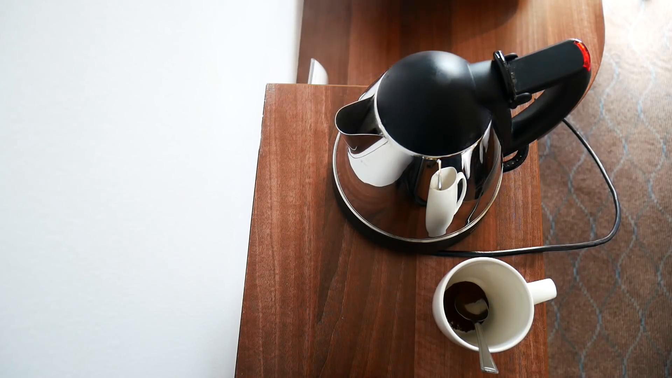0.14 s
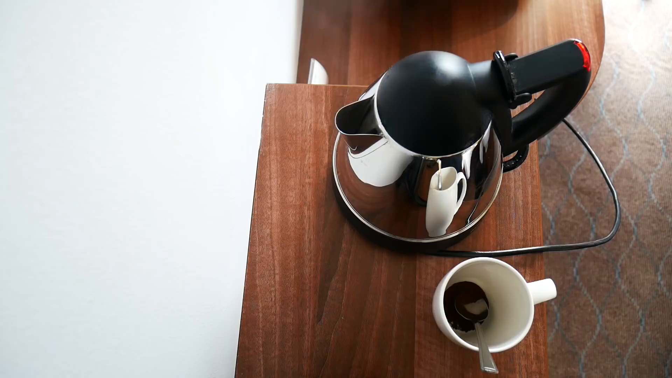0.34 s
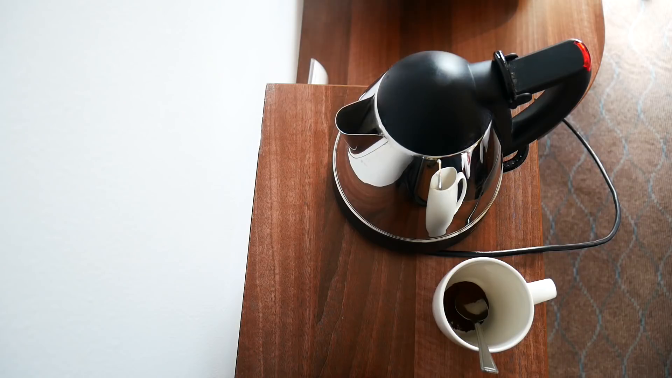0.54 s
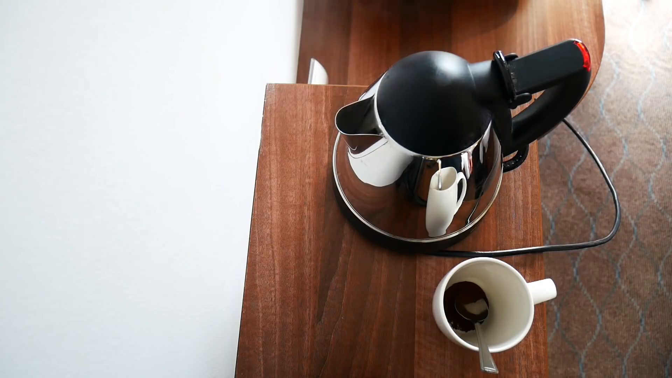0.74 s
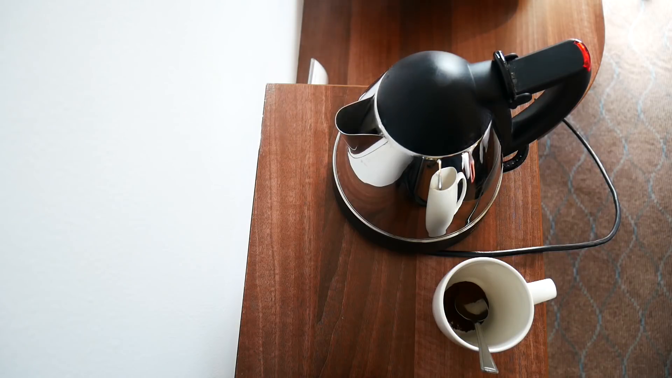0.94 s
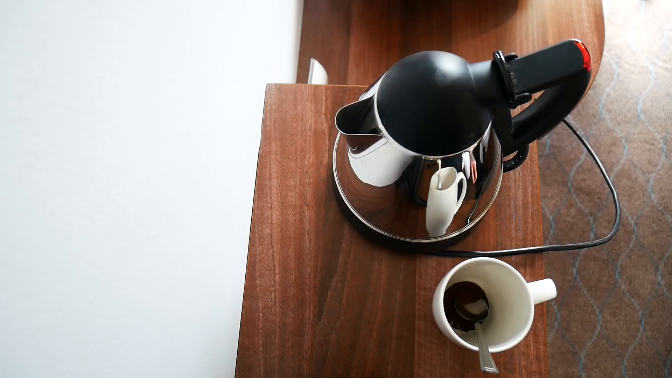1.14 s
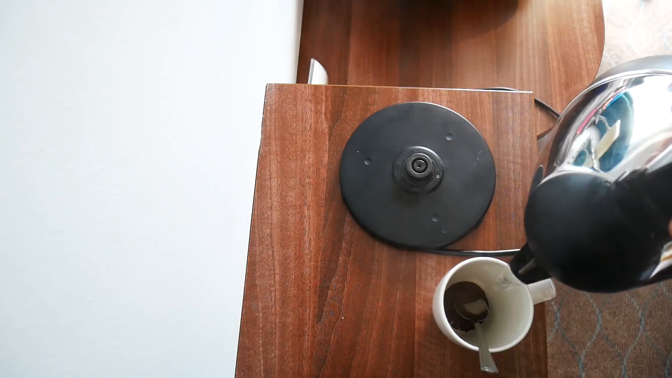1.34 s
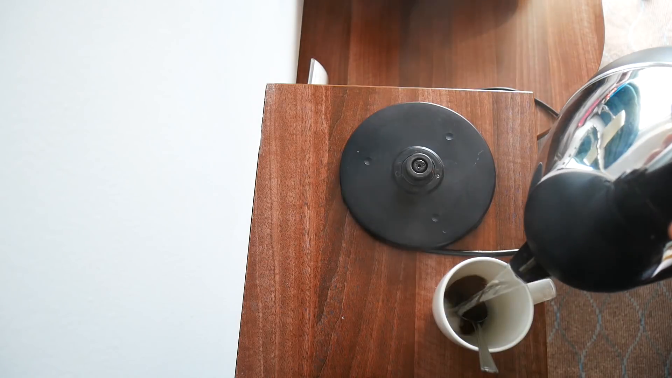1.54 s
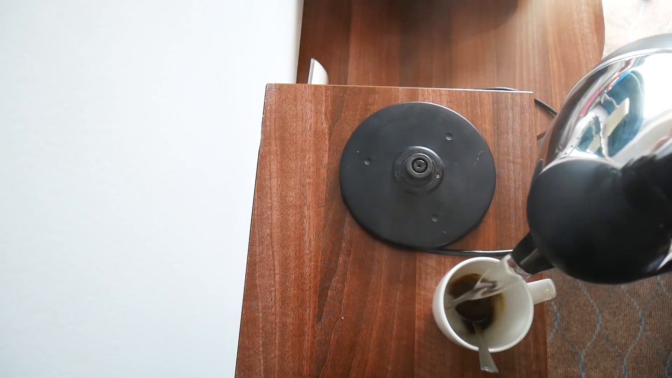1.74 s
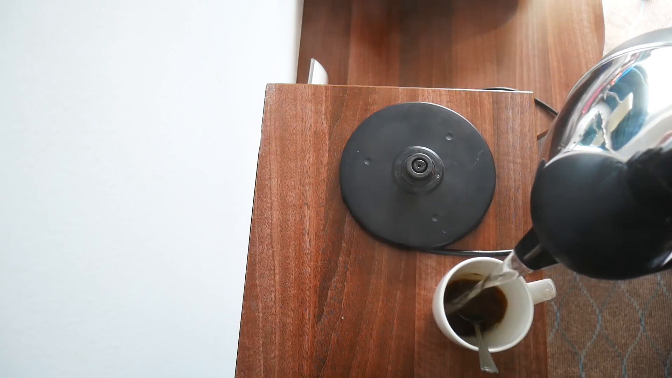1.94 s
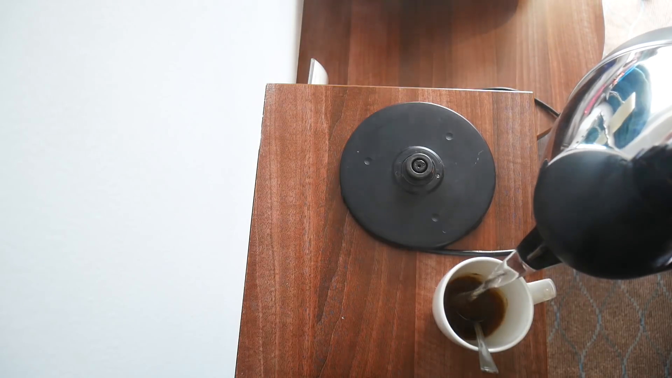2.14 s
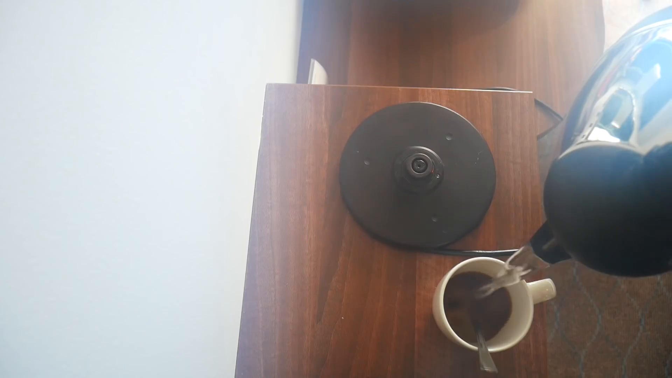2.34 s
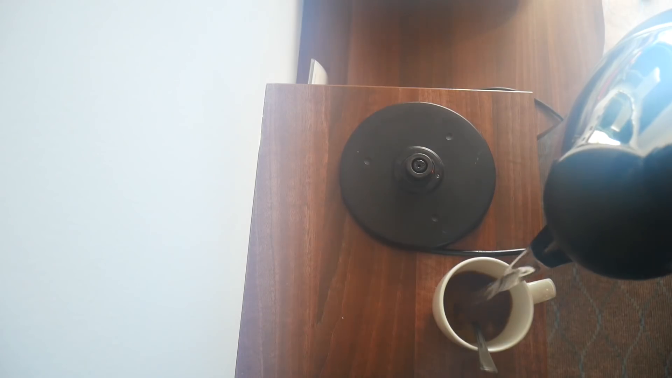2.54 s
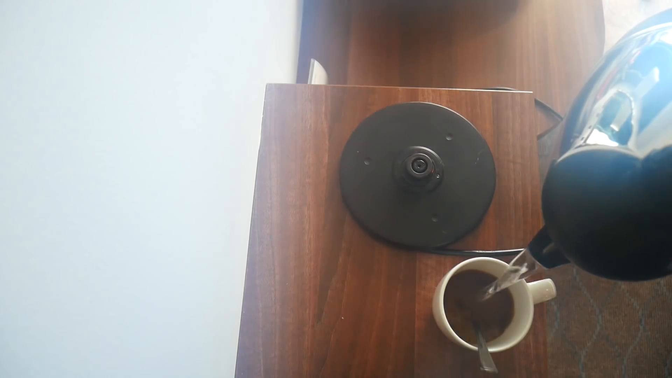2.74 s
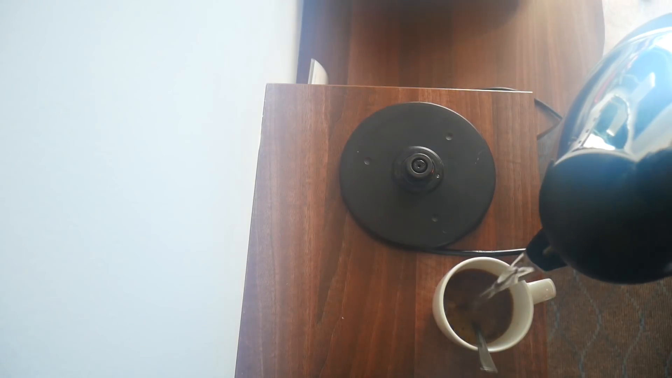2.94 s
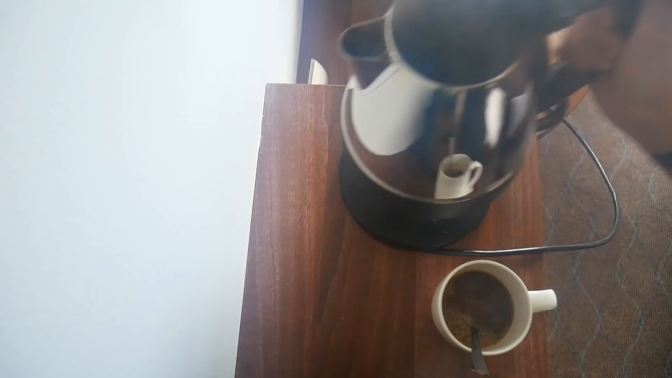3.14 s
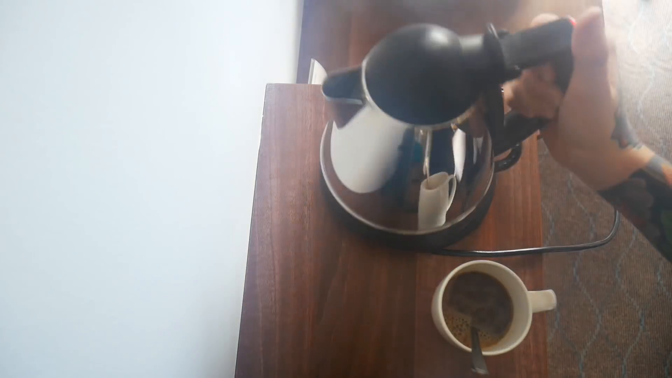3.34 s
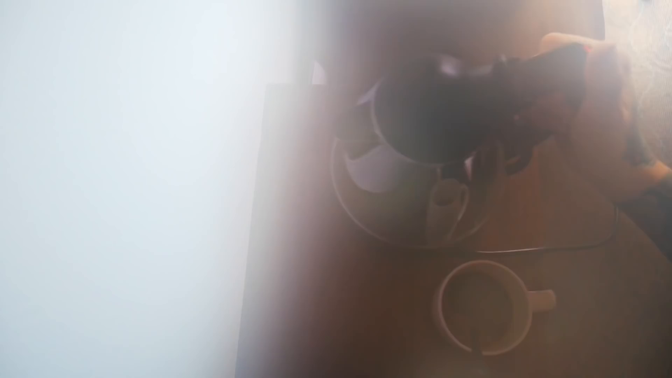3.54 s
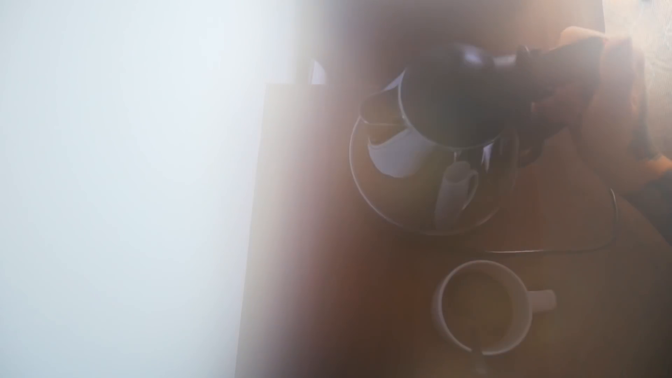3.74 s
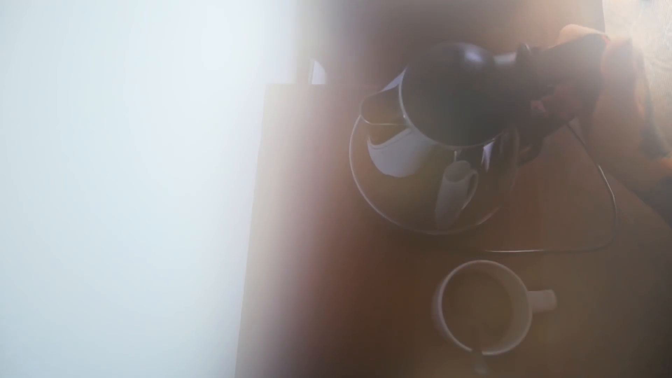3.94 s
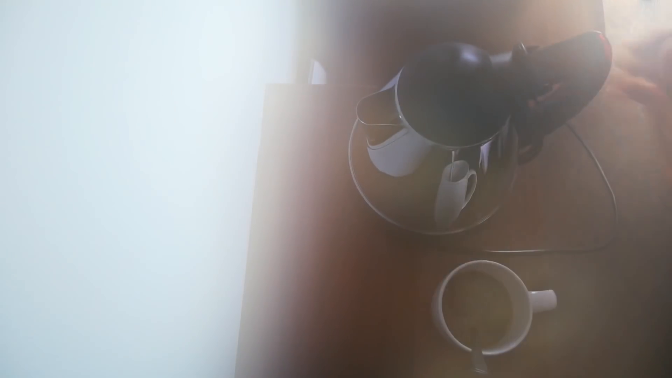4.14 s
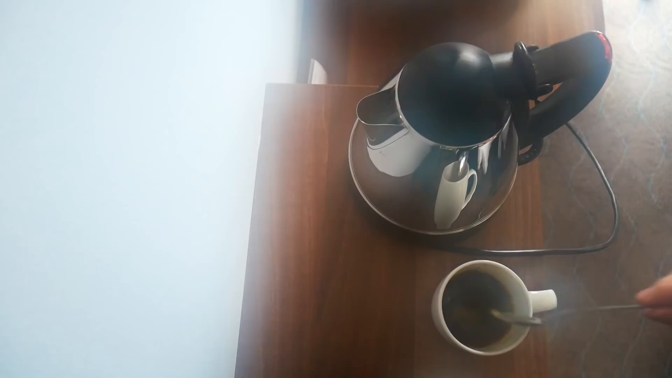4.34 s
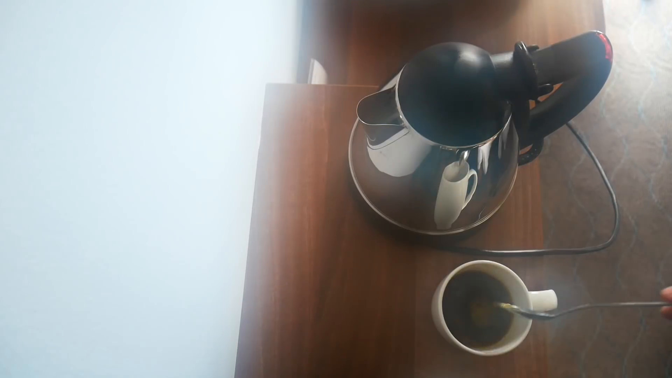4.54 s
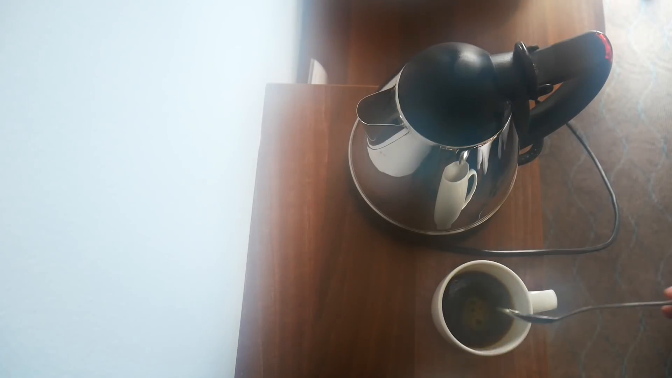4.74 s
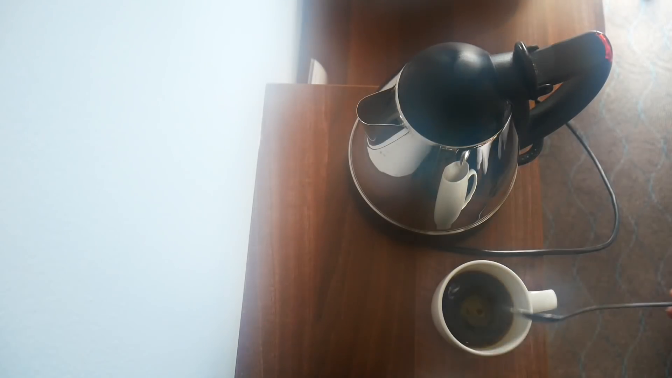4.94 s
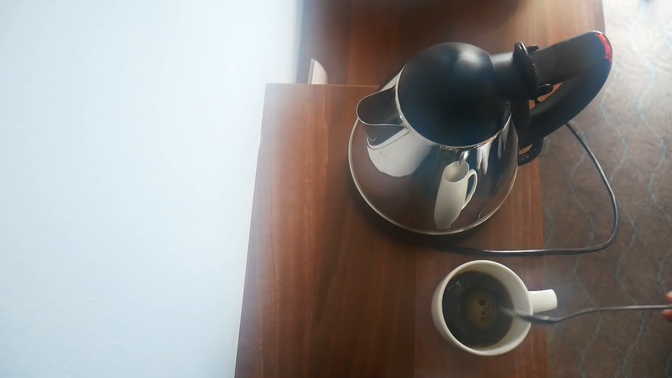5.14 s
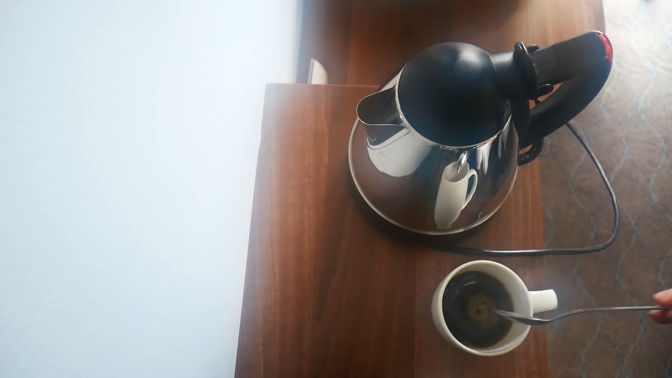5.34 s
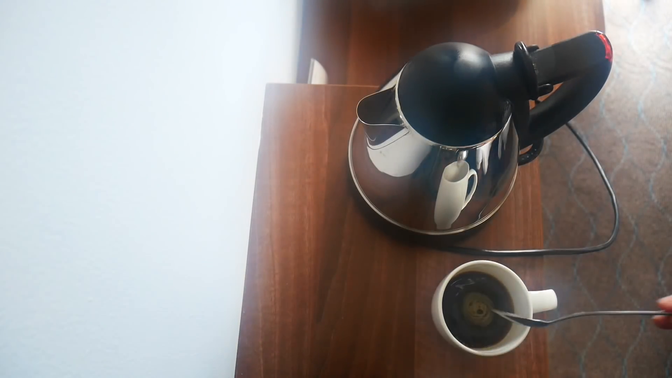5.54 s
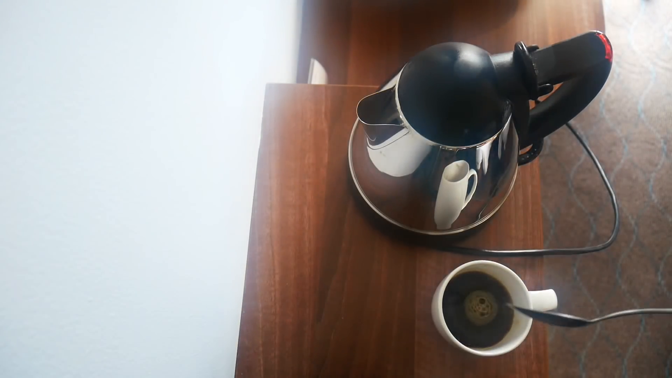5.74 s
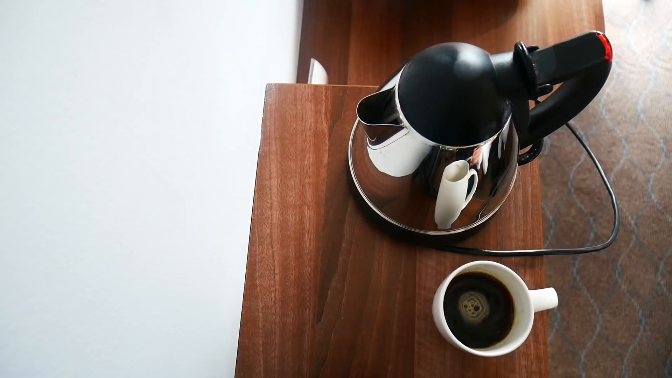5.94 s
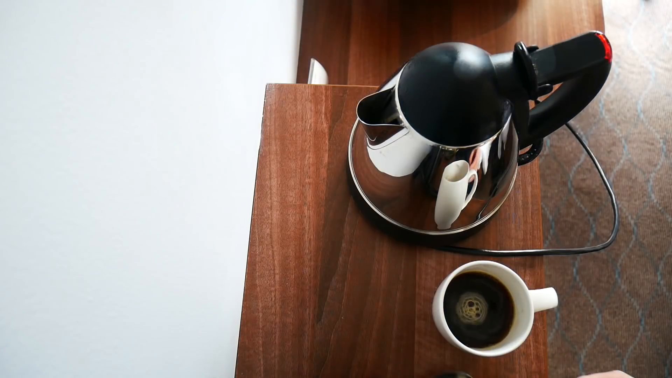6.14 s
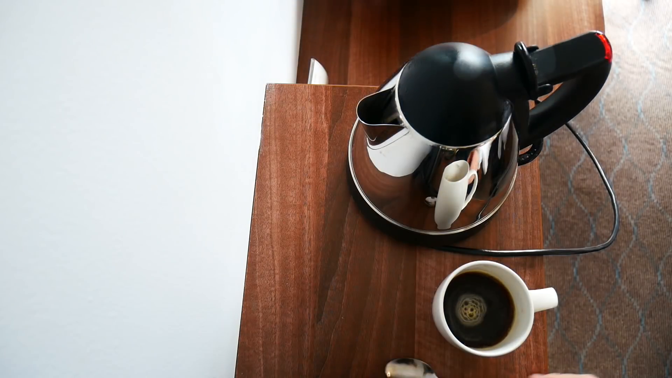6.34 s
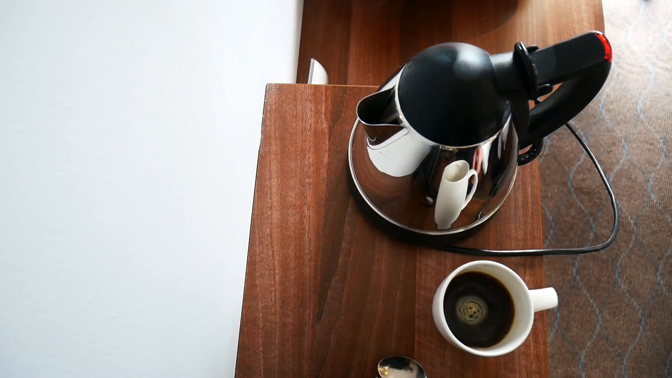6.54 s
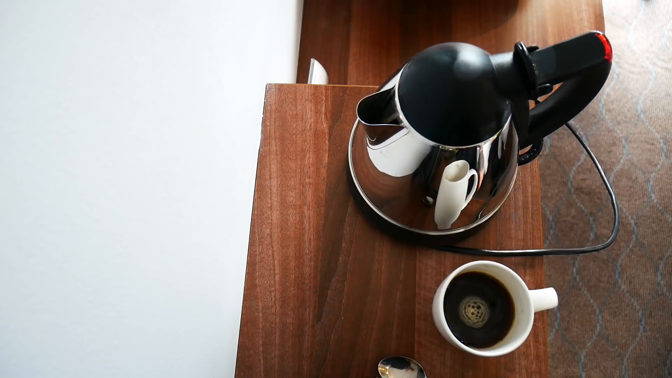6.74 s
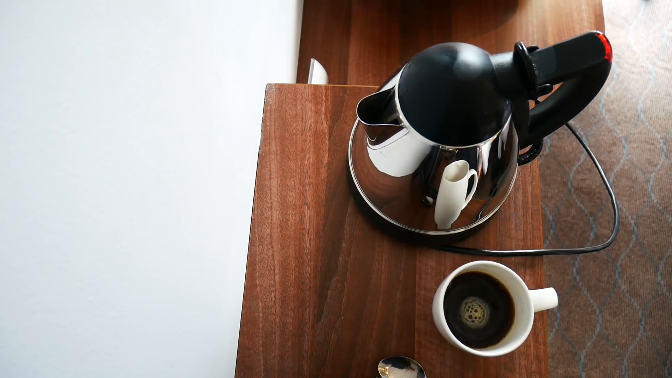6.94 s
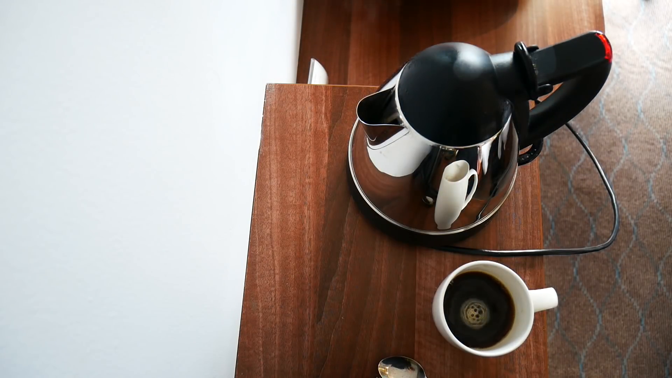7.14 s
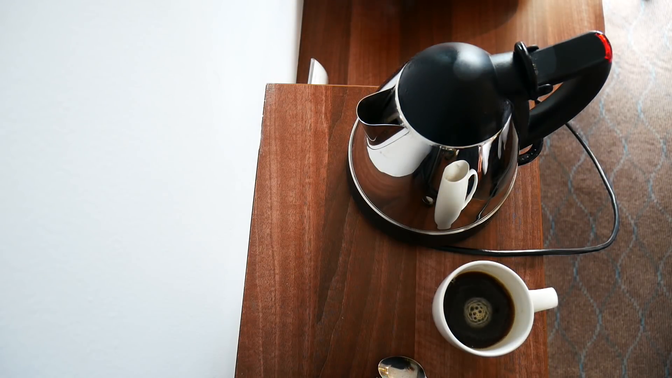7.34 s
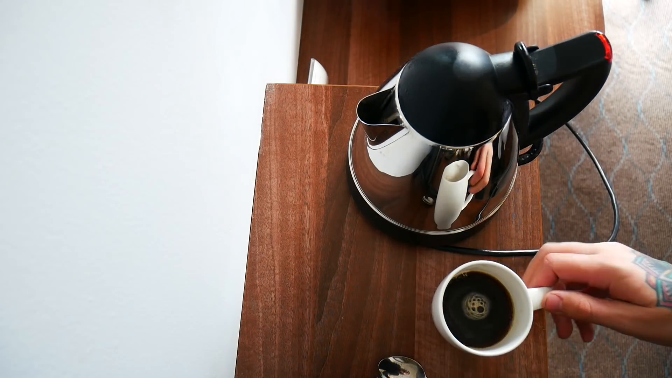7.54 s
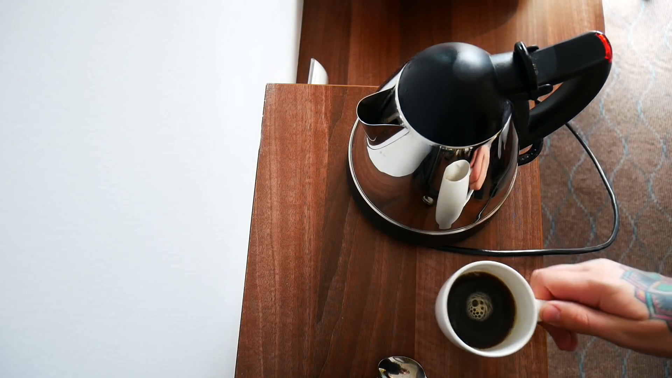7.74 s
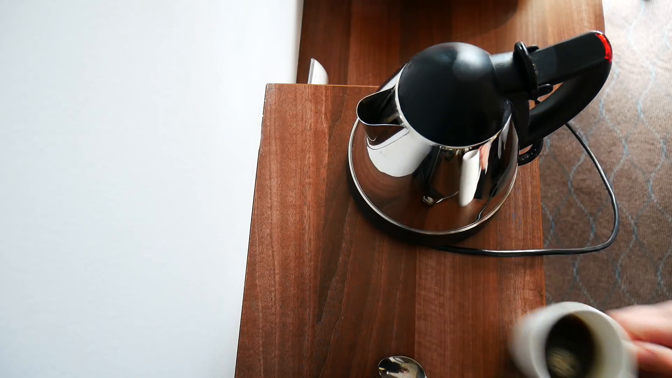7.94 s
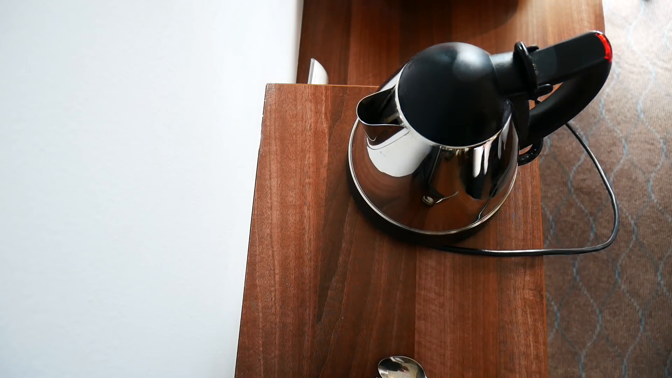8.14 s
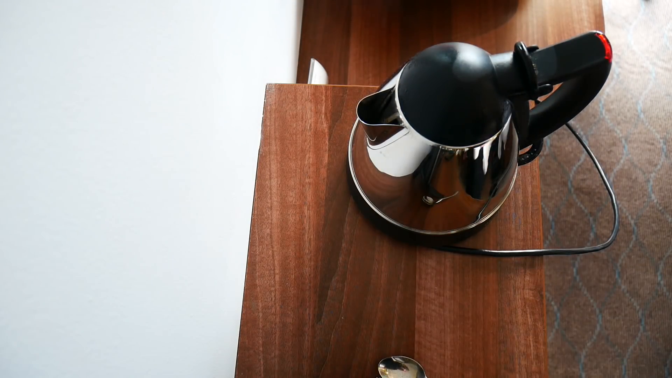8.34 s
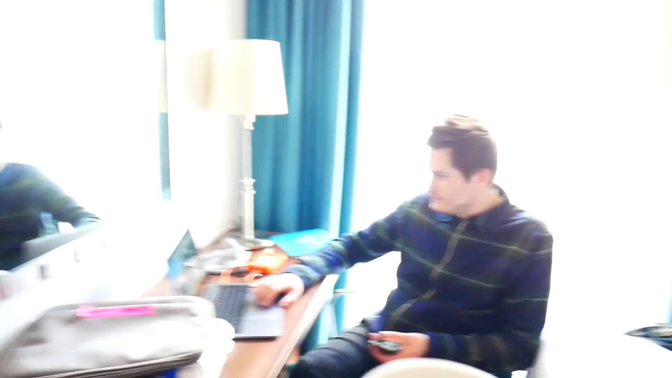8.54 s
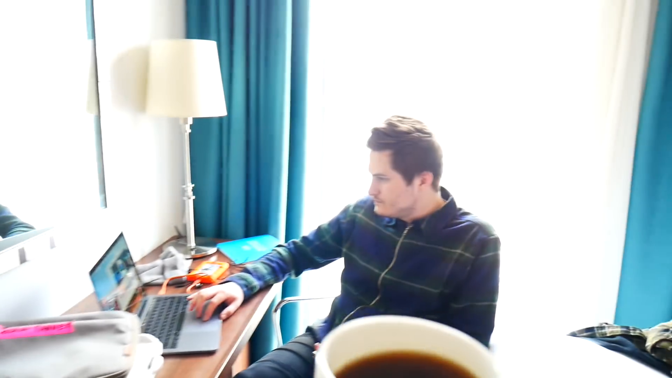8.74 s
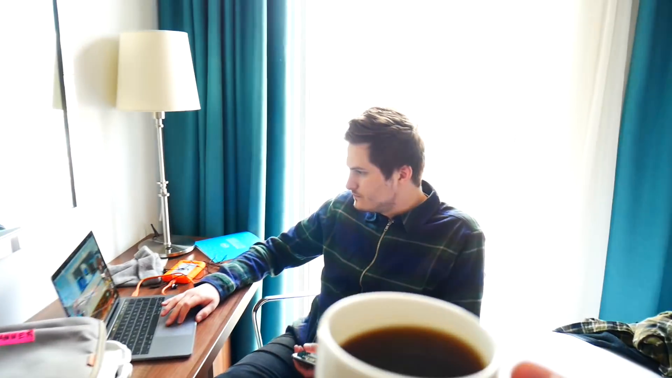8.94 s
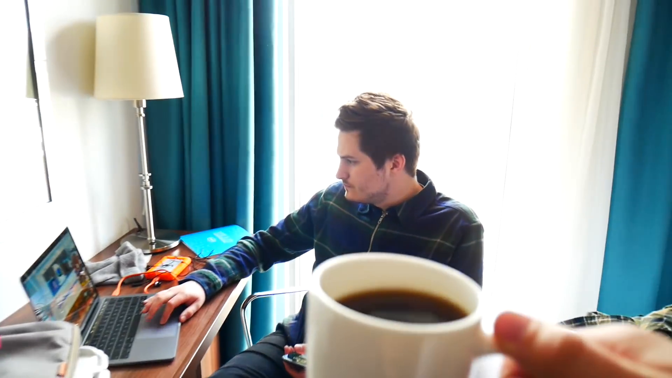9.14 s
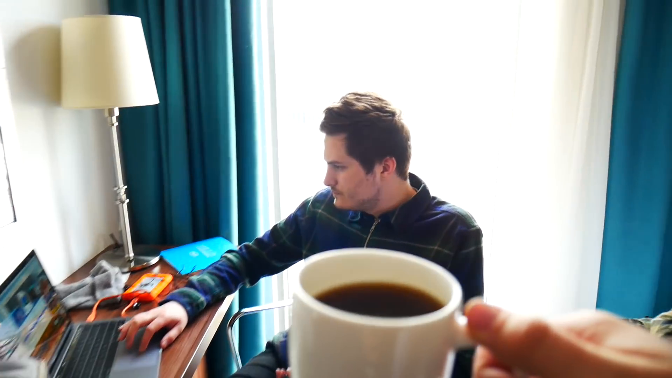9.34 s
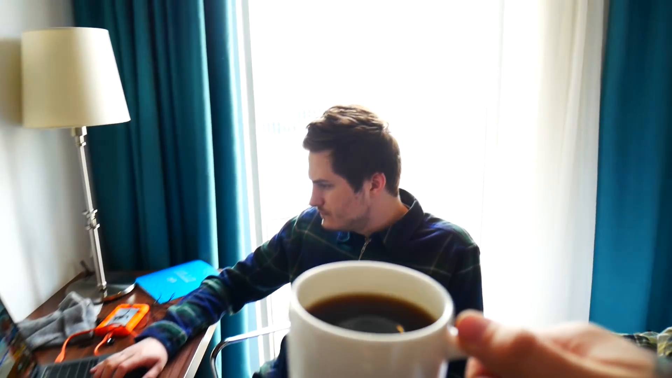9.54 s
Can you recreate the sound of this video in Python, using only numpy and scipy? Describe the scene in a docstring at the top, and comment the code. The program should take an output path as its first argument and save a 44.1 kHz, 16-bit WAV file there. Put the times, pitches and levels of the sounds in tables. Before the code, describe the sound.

In a quiet room, a steel kettle rumbles and fizzes. After a click, water gurgles into a ceramic mug, and the kettle knocks back onto its base. A spoon taps the mug five times, then drops and rocks on a wooden desk. The mug is briefly dragged away and two soft brushing sounds follow. The microphone is close, and a faint camera lens motor whirrs four times.

```python
"""In a quiet room, steam bubbles rumble and fizz in a steel kettle on a wooden desk. After a click,
water gurgles and splashes into a mug, and a camera's lens motor whirrs for the first of four times.
The kettle sloshes and knocks back onto its base. A spoon taps the mug five times, making it ring,
then is dropped and rocks on the desk. The mug is dragged away, shaking the wood, and two soft
brushing sounds pass under the last whirr of the motor."""
import sys
import numpy as np
from scipy import signal
from scipy.fft import rfft, irfft, next_fast_len
from scipy.io import wavfile
from scipy.ndimage import uniform_filter1d

SR = 44100
rng = np.random.default_rng(int(sys.argv[2]) if len(sys.argv) > 2 else 0)


def output_pcm(signal):
    """Save a mono or channel-first signal as 16-bit PCM at the path in sys.argv[1].

    Samples are clipped to [-1, 1] before scaling.
    """
    pcm = np.clip(np.atleast_2d(signal).T, -1, 1) * 32767
    wavfile.write(sys.argv[1], SR, np.round(pcm).astype(np.int16))


N = 422037

# Levels are relative: 6 dB more is about twice the height of wave. A fade time is for a 60 dB drop.
# Tone colours say how strong the lows and highs are. Each row: frequency in Hz, level in dB.
HUM_TONE = [(15, -60.5), (25, -24.5), (165, -11.5), (195, -2.5), (271, -7), (315, -2.5), (366, -11.5),
            (395, -5.5), (425, -11), (525, -9), (900, -30.5), (1170, -53.5), (1980, -120)]
AIR_TONE = [(410, -25), (700, -5.5), (910, -12), (1180, -9.5), (1640, -7), (1840, -9.5), (2130, -8),
            (2660, -13), (2840, -10), (5120, -25.5), (7000, -51), (16000, -90.5)]
HIGH_AIR_TONE = [(3000, -30), (5500, -1), (8000, -1.5), (10100, 0), (12000, -8.5), (14200, -12),
                 (16000, -28)]
RUMBLE_TONE = [(24, -78), (40, -66.5), (59, -45), (152, -15), (243, -11.5), (274, -1.5), (350, 1.5),
               (384, -4), (452, -2.5), (524, -20), (633, -15), (714, -26.5), (1000, -36.5), (1300, -61.5),
               (2200, -120)]   # big steam bubbles heard through the kettle wall
SEETHE_TONE = [(350, -18), (600, -2), (717, -18), (1040, -19), (1310, -12.5), (1570, -13.5), (1800, -11.5),
               (3080, -21.5), (3480, -17.5), (3680, -22), (5100, -28.5), (5790, -32.5), (7900, -33.5),
               (9240, -27.5), (10600, -37.5), (13600, -43), (15100, -53), (16000, -76.5)]   # fine bubbles
GURGLE_TONE = [(410, -47), (700, -18), (807, -17), (942, -2), (1300, -7), (1570, -6), (3060, 11), (3480, 7),
               (5740, -23), (8810, -47.5), (12000, -41.5), (15600, -73.5), (22000, -120)]
SPRAY_TONE = [(3000, -28), (5000, 3), (6500, -12), (9000, -5), (11000, -15), (14500, -22), (16000, -50)]
DRIP_TONE = [(2000, -29), (4500, 16), (6500, -2), (9000, 13), (11500, -12), (14500, -9), (16000, -40)]
KETTLE_THUD_TONE = [(59, -60), (100, -20.5), (244, -3.5), (322, -5.5), (608, 2), (736, -2.5), (900, -5.5),
                    (1300, -14), (3000, -47), (16000, -99)]
KETTLE_CLACK_TONE = [(100, -54), (600, -16), (950, -8), (1400, 0.5), (1800, -4), (2080, -4), (2750, -4.5),
                     (3500, -11.5), (4500, -22), (6020, -30), (10000, -31.5), (16000, -66)]
KETTLE_TICK_TONE = [(2000, -25), (4500, -1), (7000, -2), (9500, 1), (12000, -18), (16000, -45)]
TAP_TONE = [(59, -66), (100, -42), (271, -12.5), (570, -16), (648, -9), (784, -26.5), (1420, -11),
            (1720, -30), (2130, -3.5), (2580, -12.5), (2930, -8), (3700, -17), (4770, -28), (5080, -31),
            (7500, -32), (10200, -27.5), (12000, -50), (13300, -41), (16000, -68)]
BOUNCE_TONE = [(1000, -18), (3000, 2), (6000, -27), (8500, -3), (10800, 3), (12000, -25), (13300, -10),
               (16000, -38)]
DESK_TONE = [(35, -86), (60, -40), (123, -28), (229, -9.5), (285, 0), (373, -3.5), (508, -8), (570, -18.5),
             (649, -6.5), (787, -26), (967, -21.5), (1100, -43), (1300, -39), (1690, -77), (2860, -120)]
DROP_TONE = [(59, -57.5), (100, -20.5), (129, -20), (147, -23.5), (260, -4.5), (398, -8), (648, -5),
             (1030, -11), (1910, -2.5), (2520, -6), (3470, -4.5), (5190, -20), (8830, -21.5), (11500, -44),
             (13000, -40), (16000, -85)]
SPOON_TICK_TONE = [(2500, -28), (4000, 7), (10500, -1), (12500, -20), (15000, -33.5)]
GRIT_TONE = [(530, -17), (900, -4), (979, 2.5), (1190, -9.5), (1550, -3), (1720, -6), (3430, -10.5),
             (4310, -19.5), (5750, -13.5), (6640, -24), (9530, -13), (14700, -47), (16000, -63)]
LOW_BRUSH_TONE = [(400, -4), (900, -9), (1800, -3), (4000, -10), (6000, -34), (9000, -56)]
HIGH_BRUSH_TONE = [(5000, -34), (8500, -2), (10500, 2), (11500, -25), (13000, -47)]

# Resonances are pitches that an object boosts. Each row: pitch in Hz, width in Hz, level in dB.
SHELL_PEAKS = [(1297, 41, -1.5), (1800, 55, -4), (2094, 49, 0), (3422, 63, 9.5), (4480, 92, -7),
               (5000, 53, -1)]   # the kettle's steel wall
HOLLOW_PEAKS = [(1290, 12, 10), (2030, 54, 2.5), (2960, 190, 3.5), (3400, 150, 0.5), (3700, 80, -5)]   # the half-empty kettle
GEAR_PEAKS = [(2380, 400, 18.5), (3140, 300, 21), (3740, 450, -3)]

# Modes are the notes a struck object rings with. Each row: pitch in Hz, level in dB, fade in seconds.
CLINK_MODES = [(2396, 0.5, 0.16), (2500, -7, 0.098), (3420, -14, .07), (4160, -1.5, 0.041),
               (4640, -12, 0.06), (5570, -19, 0.091), (7160, -15, 0.16), (7300, -23, .1),
               (10500, -29, 0.17)]
MUG_MODES = [(637, -25, 0.21), (1500, -12.5, 0.1), (2260, -26, 0.15), (2550, -27, .2), (2986, -5.5, 0.094),
             (3520, -10, 0.078), (3800, -34, .07), (4630, -8, 0.037), (5300, -26, 0.029),
             (6840, -13, 0.049), (8620, -23, 0.1), (9840, -21, 0.089), (9800, -29, 0.09),
             (11200, -34, 0.07), (13000, -28, 0.1), (13320, -31, 0.13)]
SPOON_MODES = [(hz, db, t60) for hz, (db, t60) in zip( [1933, 3566, 4718, 6963, 8555, 9555, 10076, 10980, 11241, 12669, 13320],
               [(-13.0, 0.2), (-10, 0.22), (-1.0, 0.27), (-16.5, 0.19), (-19, 0.55), (-21.0, 0.11),
               (-0.5, 0.094), (-27.5, .3), (-16.5, 0.23), (-25.5, 0.24), (-34, 0.19)])]
DESK_MODES = [(242, -14.5, .1), (302, -3.5, .13), (339, -3, .12), (456, -9, .094), (639, -8.5, .11)]

# Sounds that swell and fade. Each row: time of full strength in seconds, hold in seconds, level in dB.
FIZZ = [(0, .039, -38.5)]
SLOPS = [(3.146, 0.011, -37.5), (3.2, 0.018, -42), (3.256, 0.016, -40.5), (3.298, 0.021, -41.5),
         (3.35, 0.026, -43.5)]   # water in the swung kettle
HOLLOW_NOTE = [(4.545, 0.053, -46)]
MOTOR_RUNS = [(2.25, 0.78, -60.5), (4.0, 1.58, -55.5), (5.98, 0.33, -55.5), (8.594, 0.91, -53)]
BASE_CHATTER = [(3.417, 0.013, -33), (3.748, 0.013, -20.5), (3.815, 0.021, -38), (3.85, .003, -29.5)]   # the kettle slides onto its socket
SPOON_RATTLE = [(6.435, 0.027, -31), (6.53, 0.15, -41), (6.65, 0.14, -36.5)]   # rocking on the wood
SPOON_RUB = [(6.68, 0.04, -49.5)]   # the fastest rocking rubs the steel
MUG_PUSH = [(7.79, .004, -29), (7.908, 0.19, -21.5)]   # gripped, then slid
MUG_GRATE = [(7.885, 0.086, -44.5), (8.0, 0.12, -39)]   # grit under its foot

# Short contacts. Each row: start in seconds, level in dB.
CLINKS = [(1.6235, -33.5), (1.6296, -34)]   # the stream knocks the spoon against the mug
KETTLE_TICKS = [(4.033, -41), (4.093, -43), (4.179, -34), (4.188, -36), (4.418, -36)]
GRAZES = [(4.418, -22), (4.427, -30), (4.535, -31), (4.553, -25), (4.572, -26), (4.59, -33)]   # the lifted spoon grazes the mug
CATCHES = [(7.770, -3), (7.777, 3.5), (7.824, -5.5), (7.884, -5), (7.894, -2), (7.907, 3.5), (7.933, 2),
           (7.957, 6.5), (8.01, -1), (8.036, 6), (8.058, 0), (8.108, -7)]   # the mug's foot catches on the wood

# Steps in the background. Each row: start in seconds, then hum, hiss and high hiss in dB.
ROOM_LEVELS = [(0, -46.5, -53, -68.5), (2.29, -47.5, -54.5, -78), (3.141, -46.5, -52, -70),
               (4.62, -47, -59, -74), (8.579, -52.5, -59, -76.5)]
# The boil in three stages; its sound jumps at the start of each. Each row: time in seconds, rumble in dB.
BOIL_STAGES = [
    [(0.0, -21.5), (.3, -16.5), (0.63, -17), (.95, -16.5), (1.259, -19)],
    [(1.259, -29), (1.34, -37), (2.138, -40), (2.2, -39.5), (2.45, -50), (3.141, -55.5)],
    [(3.141, -29), (3.32, -36), (3.72, -32.5), (3.88, -39), (3.95, -36), (4.62, -35.5)],
]
# One row a stage. Each row: seething at full boil in dB, wall ringing at start, middle and end in dB.
SEETHE_LEVELS = [(-38, -6, 3.2, -4.5), (-57, 8, 6.7, -2), (-50, -6, 3, -10)]
# Two curves, pouring and then sloshing. Each row: time in seconds, gurgle in dB.
FLOW = [
    [(1.262, -61), (1.4, -56), (1.9, -47.5), (2.138, -47), (2.414, -53), (3.141, -60)],
    [(3.141, -51), (3.33, -57), (3.72, -52), (4.1, -58), (4.62, -46)],
]
# The note of the air in the mug rises as it fills. Each row: time in seconds, pitch in Hz.
MUG_AIR = [(1.5, 890), (2.3, 1060), (2.5, 1250), (3.14, 1380)]
# Splashes and drips. Each row: start in seconds, note in dB, tick in dB, starting pitch in Hz.
SPLASHES = [(1.4136, -40, -37, 1710), (1.485, -40, -54, 2040), (1.6221, -34, -52, 2460),
            (1.8227, -42, -46, 2870), (1.856, -39, -54, 2000), (1.885, -36, -52, 900),
            (1.908, -32, -48, 2700), (1.929, -34, -46, 2500), (1.965, -37, -54, 930), (1.98, -40, -54, 930),
            (2.0204, -44.5, -46, 2900), (2.0523, -42, -49, 2900), (2.08, -38, -54, 980),
            (2.127, -38, -52, 3140), (2.134, -34, -52, 2830), (2.1494, -30.5, -48, 2900),
            (2.16, -36, -52, 2820), (2.17, -38, -54, 1010), (2.174, -38, -52, 2920),
            (2.2518, -30, -36, 2970), (2.2726, -31.5, -37, 1040), (2.338, -45, -42, 3080),
            (2.413, -48, -46, 3080), (2.44, -52, -44, 3100), (2.45, -30.5, -47, 1220),
            (2.4913, -52, -42, 3000), (2.576, -48, -50, 3000), (2.61, -47, -54.5, 3080),
            (2.636, -39, -50, 1290), (2.701, -39.5, -32, 3100), (2.7392, -37, -32, 1430),
            (2.789, -44, -48, 2100), (2.803, -50, -33, 2970), (2.8366, -34.5, -33.5, 1300),
            (2.8778, -37.5, -50, 3050), (2.902, -40, -52, 1250), (2.925, -54, -44, 3000),
            (2.978, -44.5, -38, 3000), (3.015, -44, -50, 3000), (3.08, -48, -44, 3200),
            (3.099, -36, -42, 1430)]
# The kettle meets its base. Each row: start in seconds, thud in dB, clack in dB, fade in seconds.
KNOCKS = [(3.375, -32, -25, .02), (3.389, 8, 8, 0.029), (3.414, -20, -4.5, 0.05), (3.582, -22, -22, 0.068),
          (3.592, -28, -20, .03), (3.634, -30, -23, 0.0198), (3.727, -6, -22, 0.04), (3.733, -10, -15, .03),
          (3.742, -2, -9, 0.018), (3.747, 0, -3, 0.022), (3.757, 6, 1, 0.013), (3.77, 6, 10, 0.025),
          (3.847, -2, -10, 0.043), (3.858, -12, -9, 0.023), (3.985, -18, -17.5, 0.02),
          (4.061, -26, -21.5, 0.043), (4.098, -28, -22.5, 0.049), (4.179, -32, -24, 0.042),
          (4.419, -23.5, -23.5, 0.068), (4.4735, -26, -21, 0.03), (4.655, -28, -26, .03)]
# Spoon on rim. Each row: start in seconds, crack in dB, low and high note in dB, low note in Hz, fade
# in seconds, seconds until the ring drops quieter, then the low note's twin: Hz above and dB against it.
TAPS = [(4.774, 5.6, -30.5, -50, 2114, 0.29, .11, 9.3, -3),
        (4.974, 5.6, -22.5, -35, 2094, 0.26, 0.087, 9.4, -5),
        (5.192, 5.5, -25.5, -31, 2130, 0.4, 0.089, 23, -4),
        (5.417, 4.4, -19.5, -23.5, 2156, 0.3, 0.094, 14, -4),
        (5.679, 6.1, -17, -17.5, 2154, 0.45, 0.12, 3.1, -12)]
# The spoon lands and bounces. Each row: start in seconds, then thud, low ring, high ring and tick in dB.
DROPS = [(6.352, 6, -43, -45, -34), (6.403, -3.5, -37, -37.5, -18.5), (6.4179, -6, -35, -42.5, -31),
         (6.429, -9, -39.5, -45, -33.5), (6.525, -11.5, -24.5, -21.5, -7), (6.5744, -12.5, -39.5, -28, -31),
         (6.583, -11, -32, -21, -21.5), (6.6212, -14.5, -28, -27.5, -30.5), (6.63, -13.5, -29.5, -25, -25),
         (6.6722, -13, -28.5, -29, -18), (6.71, -20, -34, -28, -30), (6.75, -27.5, -32, -42, -38.5)]
# Soft brushes. Each row: time of full strength in seconds, hold in seconds, low and high part in dB.
BRUSHES = [(8.852, 0.013, -46.5, -63), (9.247, 0.037, -51, -77)]

# For each source, in dB: how much louder it is on the left, and how much of it reaches the walls.
PAN_DB = dict(splash=-0.7, water=1.5, kettle=1.5, mug=3, spoon=0.5, drag=1.5)
ROOM_SEND_DB = dict(splash=1, water=-6.5, kettle=-4, mug=-1.5, spoon=0, drag=1)
# The camera body shades each source in its own way (FLAT is no shading).
# Each row: frequency in Hz, left minus right in dB, how far the left wave leads in radians.
FLAT = [(400, 0, 0), (9000, 0, 0)]
SHADE = dict(splash=FLAT, water=FLAT, drag=FLAT, kettle=[(500, 1, -0.22), (1120, -4, -.6),
         (1400, -1.5, 0.39), (2200, -0.5, -0.23), (9000, -.5, -0.1)], mug=[(500, -1, -.05),
         (1300, -11, 0.36), (2150, 0, -1.1), (2420, -2, -.25), (4700, 0, -0.061), (10000, -2, -0.2)],
         spoon=[(500, 1.5, .05), (2400, -0.72, -0.09), (4700, -1.5, .05), (10000, -2, .1)])
# Stereo width. Each row: frequency in Hz, level in dB of side (opposite in the ears) against mid (shared).
WIDTH = [(100, -15.5), (350, -18), (600, -12), (900, -2.5), (1600, -10), (2300, -16), (2800, -30.5),
         (3300, -59.5), (4300, -26), (4900, -19), (8000, -28), (15000, -9.5)]
# The two microphones are unequal. Each row: frequency in Hz, left minus right in dB.
MIC_TILT = [(500, 0.5), (1200, 0.5), (2300, 1.9), (4000, -1.5), (6000, 1), (8000, -1.5), (10500, -4.5),
            (14000, 1.5)]
# Their timing is unequal too. Each row: frequency in Hz, how far the left leads in radians.
MIC_LEAD = [(400, .02), (900, .1), (2000, 0.17), (3000, 0.045), (4300, 0.054), (5500, 1.76), (8000, 1.59),
            (10500, 1.1), (14000, 1.3)]


def amp(db):
    """Turn a level in dB into a number to multiply by."""
    return 10 ** (np.asarray(db) / 20)


def unit(x):
    """Scale a sound to an average strength (rms) of 1."""
    return x / np.sqrt(np.mean(x ** 2) + 1e-20)


def in_time(*tables):
    """Draw level curves through the rows, -120 dB outside them, with jumps smoothed over 5 ms."""
    t = np.arange(N) / SR
    out = np.full((len(tables[0][0]) - 1, N), -120.)
    for rows in tables:
        s, *columns = np.transpose(rows)
        inside = (t >= s[0]) & (t <= s[-1])
        out[:, inside] = [np.interp(t[inside], s, c) for c in columns]
    return uniform_filter1d(out, int(.005 * SR), axis=1)


def at_hz(points, hz):
    """Read between a table's rows, giving each octave equal space."""
    p = np.array(points)
    return np.interp(np.log(hz), np.log(p[:, 0]), p[:, 1])


def colour(x, tone):
    """Give a sound a tone colour, with a filter that rings only after each click (minimum phase)."""
    size = 4096
    cepstrum = irfft(np.log(amp(at_hz(tone, np.linspace(1, SR / 2, size // 2 + 1)))))
    cepstrum[1:size // 2] *= 2
    cepstrum[size // 2 + 1:] = 0
    response = irfft(np.exp(rfft(cepstrum)))
    response /= np.linalg.norm(response)
    return signal.oaconvolve(x, response.reshape((1,) * (x.ndim - 1) + (-1,)), axes=-1)[..., :N]


def drift(rate):
    """A random wander of size about 1 that turns roughly rate times a second."""
    r = np.exp(-80 * np.pi * rate / SR)
    slow = signal.lfilter([1], [1, -2 * r, r * r], rng.standard_normal(N // 40 + 2002))[2000:]
    return np.interp(np.arange(N) / 40, np.arange(len(slow)), unit(slow))


def hiss():
    """Two white noises, mid and side."""
    return rng.standard_normal((2, N))


def grains(per_s, spread_db):
    """Random clicks of uneven size."""
    at, size, sign = rng.random((3, int(per_s * N / SR)))
    out = np.zeros(N)
    out[(at * N).astype(int)] = amp(spread_db * np.minimum(-np.log(1 - size), 4)) * np.sign(sign - .5)
    return unit(out)


def resonate(x, peaks):
    """Pass a sound through each resonance and add up the results."""
    out = 0
    for hz, width, db in peaks:
        r = np.exp(-np.pi * width / SR)
        feedback = [1, -2 * r * np.cos(2 * np.pi * hz / SR), r * r]
        out = out + amp(db) * signal.lfilter([(1 - r * r) / 2, 0, (r * r - 1) / 2], feedback, x)
    return out


def lowpass(x, hz, order):
    """Dull everything above hz; a higher order cuts more steeply."""
    return signal.sosfilt(signal.butter(order, hz, fs=SR, output="sos"), x)


def add(out, s, sound):
    """Mix a sound in at s seconds."""
    i = round(s * SR)
    out[i:i + len(sound)] += sound[:N - i]


def swells(rows, rise_s, fall_s):
    """A loudness curve: each event rises by 60 dB, holds, and falls by 60 dB."""
    out = np.zeros(N)
    for s, hold, db in rows:
        start = max(s - rise_s, 0)
        t = start + np.arange(int((s - start + hold + fall_s) * SR)) / SR
        faded = np.maximum(s - t, 0) / rise_s + np.maximum(t - s - hold, 0) / fall_s
        add(out, start, amp(db - 60 * faded))
    return out


def ring(modes, spread_db):
    """The fading notes of one blow, their levels varied at random by spread_db."""
    t = np.arange(SR // 3) / SR
    return sum(amp(db + spread_db * rng.standard_normal() - 60 * t / fade) * np.sin(2 * np.pi * hz * t)
               for hz, db, fade in modes)


def cracks(rows, tone, tail_db):
    """Clicks with noisy tails. Each row: start in seconds, level in dB, fade in seconds."""
    out, t = np.zeros(N), np.arange(SR // 4) / SR
    for s, db, fade in rows:
        burst = amp(tail_db - 60 * t / fade) * rng.standard_normal(len(t))
        burst[0] += 1
        add(out, s, amp(db) * burst)
    return colour(out, tone)


def room_tone():
    """The building hums and the air hisses; the last step but one starts louder and sinks."""
    t = np.arange(N) / SR
    start, hum_db, air_db, high_db = np.transpose(ROOM_LEVELS)
    step = np.searchsorted(start[1:], t)
    settle = (step == len(start) - 2) * np.exp(-np.abs(t - start[-2]) / 1.45)
    hum = colour(hiss(), HUM_TONE) * amp(hum_db[step] + 6.5 * settle + 1.5 * drift(23.4))
    air = colour(hiss(), AIR_TONE) * amp(air_db[step] + 1.5 * drift(11))
    air += colour(hiss(), HIGH_AIR_TONE) * amp(high_db[step])
    return hum + air * amp(11 * settle)


def boil():
    """Big steam bubbles collapse and thump the kettle; fine ones seethe and make its wall ring."""
    stages = []
    for rows, (full_db, *wall_db) in zip(BOIL_STAGES, SEETHE_LEVELS):
        s, db = np.transpose(rows)
        seething = full_db + .3 * (db - db[1:].max())   # gently follows the rumble
        ringing = np.interp(s, np.linspace(s[0], s[-1], len(wall_db)), wall_db)
        stages.append(np.column_stack([s, db, seething, ringing]))
    rumble_db, seethe_db, shell_db = in_time(*stages)
    thumps = np.array([grains(1500, 3), grains(1400, 5.1)])
    rumble = colour(thumps, RUMBLE_TONE) * amp(rumble_db + 1.57 * drift(4.6))
    fine = colour(hiss() + .45 * thumps, SEETHE_TONE)
    shell = sum(amp(shell_db + 2.3 * drift(13)) * resonate(fine, [peak]) for peak in SHELL_PEAKS)
    return rumble + (fine + shell) * amp(seethe_db + 1.57 * drift(31))


def fizz_and_slosh():
    """The boil opens with a fizz; later, water slops in the hollow kettle and a short note sounds."""
    froth = rng.standard_normal(N) + .99 * grains(1000, 3)
    froth = lowpass(froth, hz=4400, order=4)   # dulled by the kettle wall
    fizz = unit(resonate(froth, [(2660, 403, 0)])) * swells(FIZZ, rise_s=1, fall_s=.54)
    slops = unit(resonate(froth, HOLLOW_PEAKS)) * swells(SLOPS, rise_s=.034, fall_s=.066)
    note = unit(resonate(froth, [(954, 30, 0)])) * swells(HOLLOW_NOTE, rise_s=.067, fall_s=.067)
    return fizz + slops + note


def pour():
    """The stream gurgles in clumps of short, rising bubble notes, over rushing noise and spray."""
    start_s, end_s, clump_count = 1.262, 3.36, 140
    notes, t = np.zeros((2, N)), np.arange(SR // 25) / SR
    clumps = start_s + 3.3 * rng.random(clump_count)
    for clump, when, pitch, size, rise, side in rng.random((1500, 6)):
        s = clumps[int(clump * clump_count)] - .025 * np.log(1 - when)
        hz = 760 * 2 ** (2.45 * pitch)
        if pitch < .22 and s < MUG_AIR[-1][0]:   # the lowest notes follow the air in the mug
            hz = np.interp(s, *np.transpose(MUG_AIR)) * (.95 + .3 * pitch)
        note = np.sin(2 * np.pi * hz * t * (1 + 3 * rise * t)) * amp(-60 * t * hz / 23 - 24 * size)
        add(notes[int(side < .5)], s, note * amp(-2 * (s > end_s)))   # softer once it only sloshes
    stream = .42 * unit(colour(notes, GURGLE_TONE)) + .36 * colour(hiss(), GURGLE_TONE)
    stream[0] += amp(-27) * colour(grains(120, 6.6), SPRAY_TONE)
    flow_db, = in_time(*FLOW)
    return amp(flow_db + 1.2 * drift(15)) * stream


def splashes():
    """Each splash is a bubble note, a spatter and a bright tick; the stream also clinks the spoon."""
    out, t = np.zeros(N), np.arange(SR // 20) / SR
    for (s, db, _, hz), rise in zip(SPLASHES, rng.random(len(SPLASHES))):
        add(out, s, amp(db - 60 * t / .019) * np.sin(2 * np.pi * hz * t * (1 + 7.7 * rise * t)))
    out += cracks([(s, db + 2, .025) for s, db, *_ in SPLASHES], GURGLE_TONE, tail_db=-8.5)
    out += cracks([(s, db, .015) for s, _, db, _ in SPLASHES], DRIP_TONE, tail_db=-16)
    for s, db in CLINKS:
        add(out, s, amp(db) * ring(CLINK_MODES, 1.5))
    return out


def lens_motor():
    """The motor steps fifty times a second; each step ticks and chirps upward over the gears' hiss."""
    step_s, chirp_hz, peak_s = .02, 2700, .0018
    steps, t = np.zeros(N), np.arange(SR // 100) / SR
    at = (np.arange(.0151, N / SR, step_s) * SR).astype(int)
    steps[at] = amp(-14 * rng.random(len(at)))
    chirp = np.sin(2 * np.pi * chirp_hz * t * (1 + 66 * t)) * np.exp(-((t - peak_s) / peak_s * 2) ** 2)
    ticks = np.convolve(steps, amp(-60 * t / .028))[:N] * rng.standard_normal(N)
    gears = resonate(unit(ticks) + .97 * rng.standard_normal(N), GEAR_PEAKS)
    whirr = unit(resonate(gears, [(3300, 910, 0)])) + amp(-6) * unit(np.convolve(steps, chirp)[:N])
    return swells(MOTOR_RUNS, rise_s=.06, fall_s=.17) * unit(lowpass(whirr, hz=4500, order=6))


def kettle_knocks():
    """Steel meets the plastic base with dull thuds and bright clacks, chattering as it settles."""
    chatter = grains(1500, 2.5) * swells(BASE_CHATTER, rise_s=.065, fall_s=.14)
    thuds = cracks([(s, db - 3.5, fade) for s, db, _, fade in KNOCKS], KETTLE_THUD_TONE, tail_db=-16)
    ticks = cracks([(s, db, .012) for s, db in KETTLE_TICKS], KETTLE_TICK_TONE, tail_db=-15)
    clacks = cracks([(s, db, fade) for s, _, db, fade in KNOCKS], KETTLE_CLACK_TONE, tail_db=-18)
    return thuds + ticks + clacks + colour(chatter, KETTLE_CLACK_TONE)


def mug_taps():
    """Grazes and taps ring the mug; each tap also cracks, bounces lightly and thuds through the desk."""
    out = cracks([(s, db, .025) for s, db, *_ in TAPS], TAP_TONE, tail_db=-17)
    out += cracks([(s + .014, db - 30.5, .03) for s, db, *_ in TAPS], BOUNCE_TONE, tail_db=-14)
    out += cracks([(s + .002, db - 15, .25) for s, db, *_ in TAPS], DESK_TONE, tail_db=-11.5)
    for s, db, *_ in TAPS + GRAZES:
        add(out, s, amp(db - 27.5) * ring(MUG_MODES, 1.5))
    return out


def rim_ring():
    """The rim rings with two bell notes, each throbbing against a weaker twin just above it."""
    high_hz, high_beat_hz = 2348, 5.7
    out, t = np.zeros(N), np.arange(SR // 3) / SR
    # As the froth clears, the low note tends to rise and the ring to last longer.
    for s, _, low_db, high_db, low_hz, fade, drop_s, beat_hz, twin_db in TAPS:
        low = ring([(low_hz, low_db, fade), (low_hz + beat_hz, low_db + twin_db, fade)], 0)
        high = ring([(high_hz, high_db, fade), (high_hz + high_beat_hz, high_db - 12, fade)], 0)
        high *= 1 - np.exp(-t / .022)   # builds up gradually
        drop = amp(-11.5 * np.clip((t - drop_s) / .005, 0, 1))   # the ring suddenly drops quieter
        add(out, s, (low + high) * drop)
    return out * amp(3 * drift(26))   # swirling water makes the ring waver


def spoon_drop():
    """Bounces on the wood strike the spoon's steel; rocking rubs it with many tiny contacts."""
    build_s, rest_s, rub_fade_s = .0027, 6.835, .16
    out = cracks([(s, db, .04) for s, db, *_ in DROPS], DROP_TONE, tail_db=-14.5)
    out += cracks([(s, db, .012) for s, *_, db in DROPS], SPOON_TICK_TONE, tail_db=-6.5)
    t = np.arange(SR // 3) / SR
    soft_start = np.clip(t / build_s, 0, 1)
    for s, _, low_db, high_db, _ in DROPS:
        touches = sum(np.clip((t + s - later) / build_s, 0, 1) for later, *_ in DROPS if later > s)
        at_rest = np.clip((t + s - rest_s) / .02, 0, 1)
        bowl = amp(low_db - 11 * at_rest) * ring(SPOON_MODES[:3], 1.2)
        high = amp(high_db) * ring(SPOON_MODES[3:], 1.3)
        add(out, s, amp(-2.5 * touches) * soft_start * (bowl + high))   # later touches muffle the ring
    contacts = grains(1200, 1.7)
    # Rubbing favours the high notes, and the wood cuts their ringing short.
    rub_modes = [(hz, db + 1.5 * np.log2(hz / SPOON_MODES[-1][0]), min(fade, rub_fade_s))
                 for hz, db, fade in SPOON_MODES]
    rubbing = contacts * swells(SPOON_RUB, rise_s=.44, fall_s=.17)
    steel = signal.fftconvolve(rubbing, soft_start * ring(rub_modes, 0))[:N]
    rattle = colour(contacts * swells(SPOON_RATTLE, rise_s=.25, fall_s=.22), DROP_TONE)
    return out + steel + rattle


def mug_drag():
    """Rough ceramic catches and slips on the wood, shaking the desk and grating."""
    slips = grains(1500, 2.1)
    scrape = slips + .26 * rng.standard_normal(N)
    grit = colour(scrape * swells(MUG_GRATE, rise_s=.16, fall_s=.061), GRIT_TONE)
    grit += resonate(grit, [(hz, 120, 1.5) for hz, *_ in MUG_MODES[1:8]])   # the mug sings along
    boom = colour(slips * swells(MUG_PUSH, rise_s=.076, fall_s=.22), DESK_TONE)
    soft_start = np.clip(np.arange(SR // 3) / SR / .007, 0, 1) ** 2
    for s, db in CATCHES:
        add(boom, s, amp(db - 26.5) * soft_start * ring(DESK_MODES, 2))
    return boom + grit + cracks([(s, db, .03) for s, db in CATCHES], DESK_TONE, tail_db=-21.5)


def brushes():
    """Two soft brushing sounds, each a grainy noise with a thin hiss on top."""
    rise_s, fall_s = .11, .2
    low = colour(hiss() + .69 * grains(300, 2.8), LOW_BRUSH_TONE)
    low *= swells([(s, hold, db) for s, hold, db, _ in BRUSHES], rise_s, fall_s)
    high = colour(hiss(), HIGH_BRUSH_TONE)
    high *= swells([(s, hold, db) for s, hold, _, db in BRUSHES], rise_s, fall_s)
    return low + high


def echoes(x):
    """A small furnished room answers with a short wash of echoes, the highs dying first."""
    low_fade_s, high_fade_s = .34, .27
    t = np.arange(SR // 2) / SR
    noise = rng.standard_normal((2, len(t))) * [[1], [1.5]]   # mid and side
    low = lowpass(noise, hz=3000, order=2)
    tail = low * amp(-60 * t / low_fade_s) + (noise - low) * amp(-60 * t / high_fade_s)
    tail *= np.clip(t / .0034, 0, 1)
    return amp(-7) * signal.oaconvolve(x[None], tail / np.linalg.norm(tail[0]), axes=1)[:, :N]


def left_right(x, tilt, lead, left_db=0):
    """Shift level and timing half one way on the left and half the other way on the right."""
    size = next_fast_len(N)
    hz, halves = np.linspace(1, SR / 2, size // 2 + 1), [[.5], [-.5]]
    gains = amp((left_db + at_hz(tilt, hz)) * halves) * np.exp(1j * at_hz(lead, hz) * halves)
    return irfft(rfft(x, size) * gains, size)[:, :N]


def pan(x, name):
    """Place one source between the two microphones."""
    shade = np.array(SHADE[name])
    return left_right(x, tilt=shade[:, :2], lead=shade[:, ::2], left_db=PAN_DB[name])


def widen(pair):
    """Turn mid and side into left and right; the microphones' spacing colours the side."""
    size = next_fast_len(N)
    width = amp(at_hz(WIDTH, np.linspace(1, SR / 2, size // 2 + 1)))
    side = irfft(rfft(pair[1], size) * width, size)[:N]
    return np.array([pair[0] + side, pair[0] - side])


def scene():
    """Mix the sounds placed on the desk, the spread-out sounds and the lens motor."""
    near = dict(splash=splashes(), water=fizz_and_slosh(), kettle=kettle_knocks(),
                mug=mug_taps(), spoon=spoon_drop(), drag=mug_drag())
    rim = rim_ring()
    direct = sum(pan(x, name) for name, x in near.items()) + pan(rim, "mug")
    to_walls = amp(-8) * rim + sum(amp(ROOM_SEND_DB[name]) * x for name, x in near.items())
    spread = echoes(to_walls) + boil() + pour() + brushes()
    spread += room_tone() * amp([[0], [7]])   # extra side makes the background wider
    return direct + widen(spread) + lens_motor()


def record(dry):
    """Two small microphones round off peaks and lose deep bass and top; a click precedes the pour."""
    low_hz, top_hz, click_s = 84, 16300, 1.257
    mic = np.tanh(left_right(dry, MIC_TILT, MIC_LEAD))
    mic = signal.sosfilt(signal.butter(3, low_hz, "high", fs=SR, output="sos"), mic)
    click = np.zeros(N)
    add(click, click_s, amp(-13.5) * np.exp(-np.arange(SR // 20) / SR / .00088))
    return signal.sosfilt(signal.cheby2(12, 70, top_hz, fs=SR, output="sos"), mic + click)


dry = scene()
out = record(dry)
output_pcm(out)
```